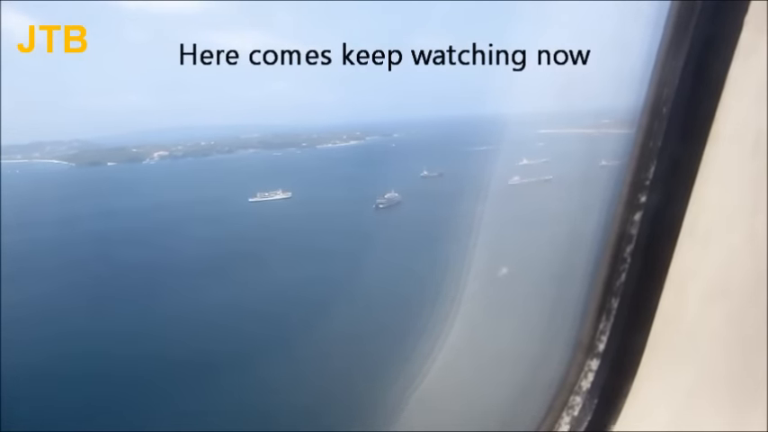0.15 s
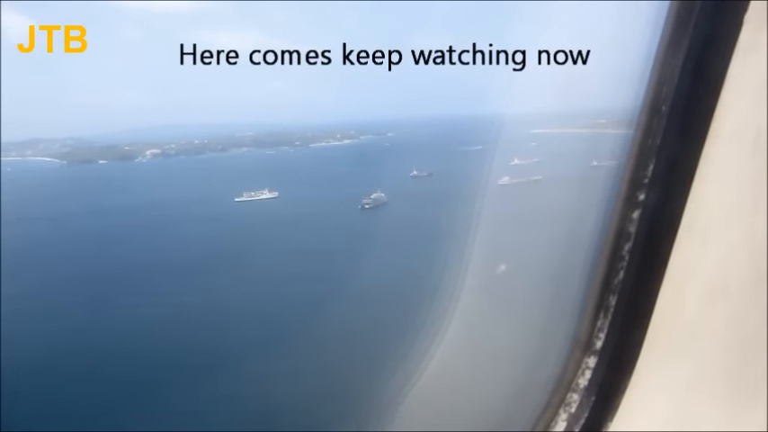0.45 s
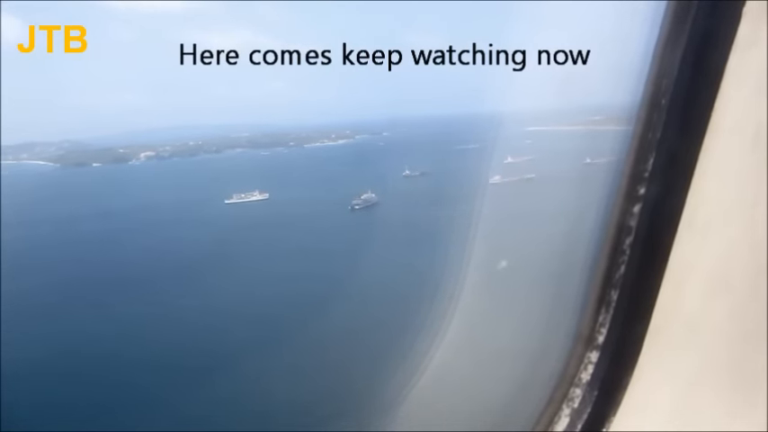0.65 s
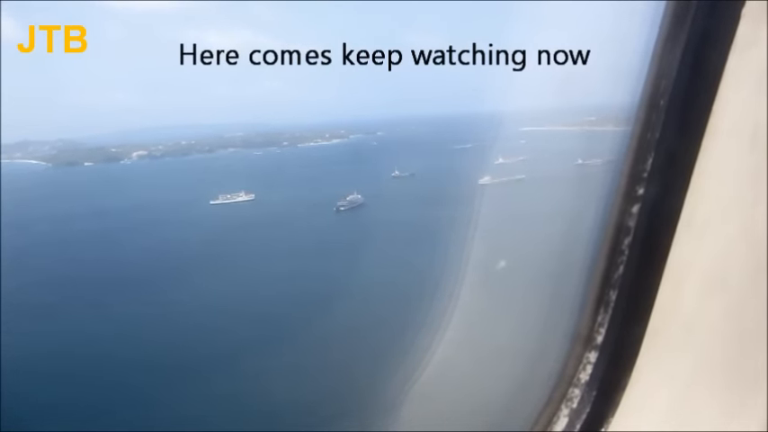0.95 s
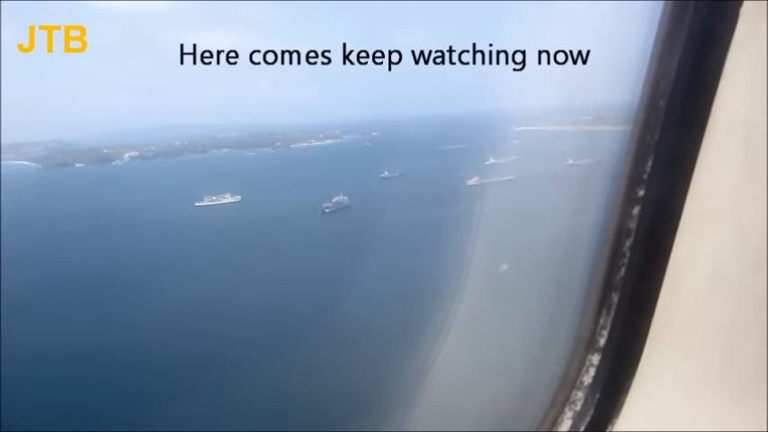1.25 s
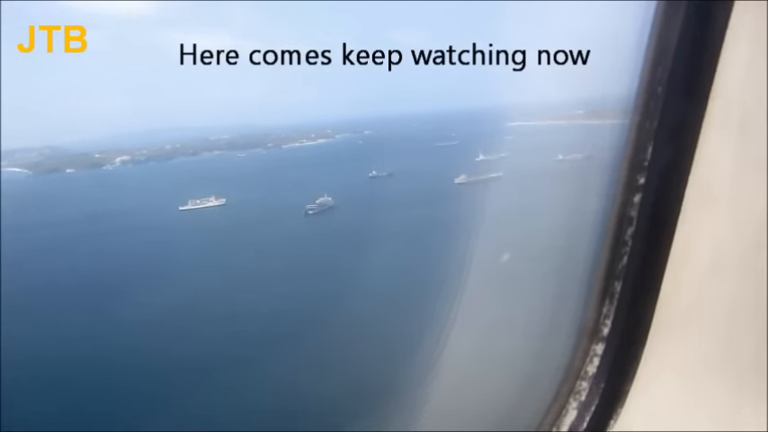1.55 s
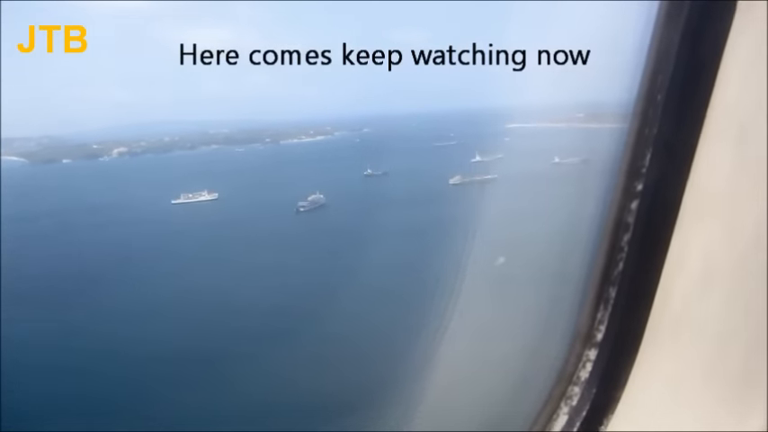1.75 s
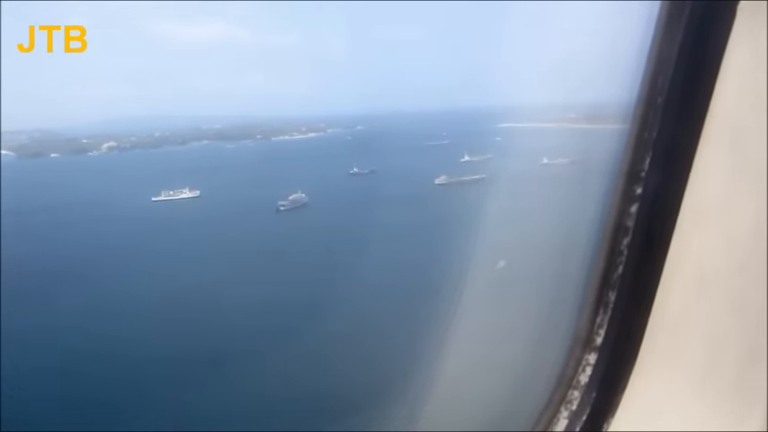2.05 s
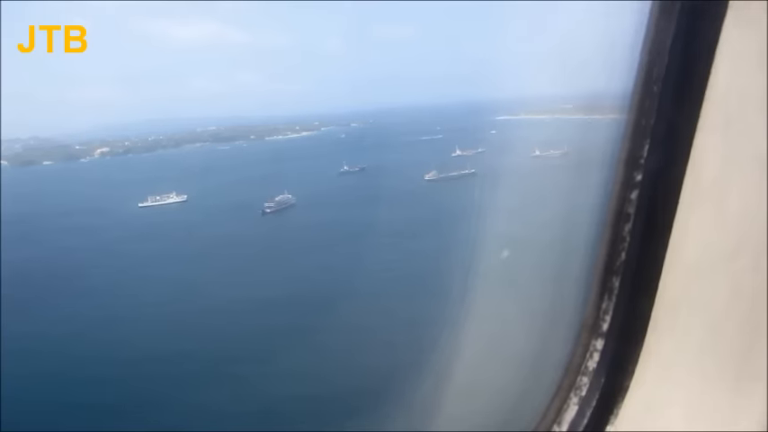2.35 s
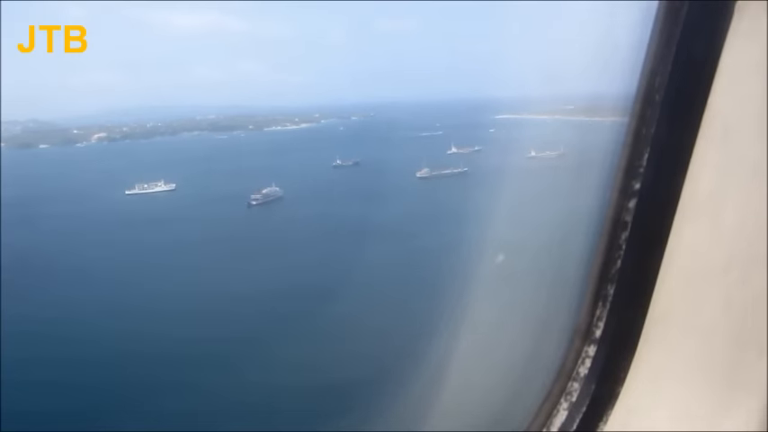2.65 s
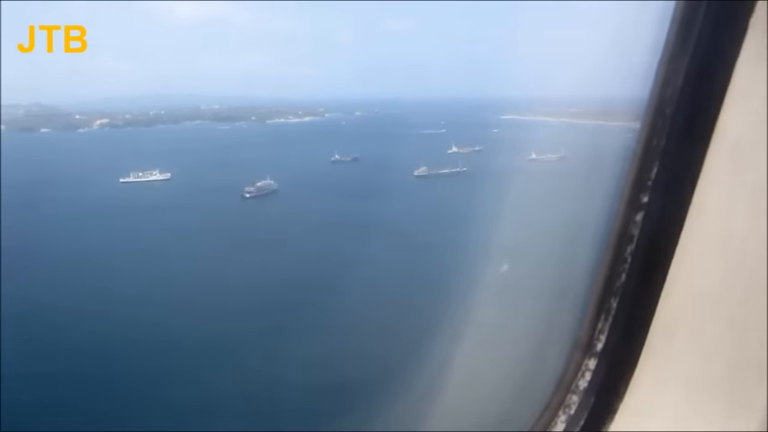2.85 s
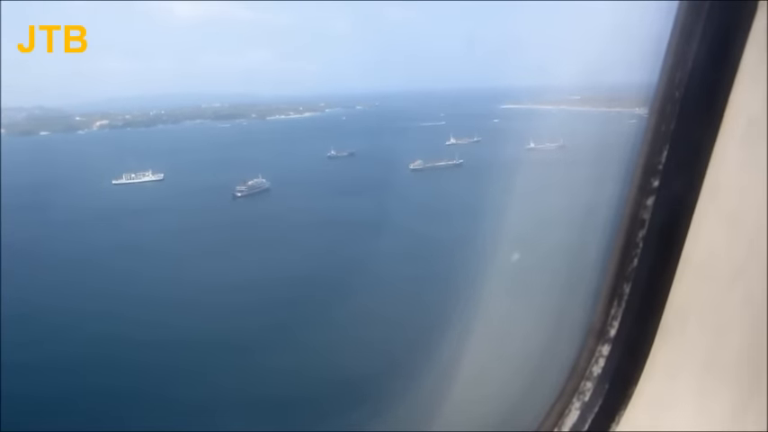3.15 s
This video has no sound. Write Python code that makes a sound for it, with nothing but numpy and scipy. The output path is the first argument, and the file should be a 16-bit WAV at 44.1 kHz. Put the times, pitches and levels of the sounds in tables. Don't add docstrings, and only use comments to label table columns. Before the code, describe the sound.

Steady low propeller drone heard inside an airliner cabin, with soft buffeting rumble, muffled air roar and a thin, wavering high whine; one small plastic tick near the end, close to the stereo camera microphone.

```python
import sys
import numpy as np
from scipy import signal
from scipy.fft import rfft, irfft, next_fast_len
from scipy.io import wavfile
from scipy.ndimage import uniform_filter1d, map_coordinates

SR = 44100
rng = np.random.default_rng(int(sys.argv[2]) if len(sys.argv) > 2 else 0)


def gain_from_db(level_db):
    decades = np.asarray(level_db, float) / 20
    return 10 ** decades


def wrap_up_sound(samples):
    columns = np.atleast_2d(samples).T
    tamed = np.clip(columns, -1, 1)
    steps = np.round(tamed * 32767).astype(np.int16)
    wavfile.write(sys.argv[1], SR, steps)


N = 145530

BLADE_HZ = 120.15

# time in seconds, blade tone in dB, its octave in dB.
BLADE_LEVELS = [(0, -20.5, -32.5), (.25, -19.5, -31.5), (.8, -20.5, -32), (1.4, -21.5, -31.5),
                (1.7, -21, -46.5), (2.05, -20, -33.5), (2.4, -20, -34), (2.6, -18, -33),
                (2.83, -19.5, -45.5), (3.1, -18.5, -35), (3.3, -21.5, -34.5)]
# time in seconds, tooth mesh rate in Hz.
NEAR_MESH = [(0, 5745), (.33, 5731), (.66, 5723), (1.0, 5718), (1.32, 5713), (1.65, 5711), (1.97, 5713),
             (2.3, 5718), (2.63, 5724), (2.96, 5729), (3.3, 5732)]
MESH_SIDES = [-87, -77, -82, -80, -76, -99, -74, -72.5, -76, -81, -80, -88]
OCTAVE_SIDES = [-84, -84, -78, -74, -79, -71, -69, -78, -76, -85, -84]
FAR_SIDES = [-8, 0, -15]
# time in seconds, near mesh tone in dB, far mesh tone in dB.
WHINE_LEVELS = [
    (0, -61, -84),
    (.6, -67, -84),
    (1.15, -72, -76),
    (1.45, -71, -63),
    (1.75, -64, -68),
    (2.1, -70, -71),
    (2.55, -67, -69),
    (2.9, -72, -79),
    (3.3, -70, -84),
]
# time in seconds, gear rasp in dB.
GEAR_EFFORT = [(0, -61.5), (.4, -63.5), (1.0, -62.5), (1.17, -59), (1.35, -61), (1.9, -62), (2.05, -56),
               (2.25, -64), (2.6, -59), (2.8, -66), (3.3, -61)]
# time in seconds, airflow in dB.
AIRFLOW = [
    (0, -36),
    (.85, -36),
    (1.3, -35.5),
    (1.6, -33.5),
    (2.2, -33.5),
    (2.7, -36.5),
    (2.95, -37.5),
    (3.3, -37.5),
]
# time in seconds, rumble in dB.
BUFFETS = [(0, -41), (.25, -30), (.42, -41), (.62, -29.5), (1.0, -39.5), (1.2, -35.5), (1.5, -36),
           (1.75, -34), (1.9, -37.5), (2.1, -29), (2.5, -39), (2.75, -34.5), (3.3, -41)]

# frequency in Hz, density in dB per Hz.
GEAR_RASP = [(4800, -25), (5300, -7), (5440, -14), (5680, -4), (5880, -6), (6000, 0), (6200, -8),
             (7000, -22)]
SKIN_ROAR = [(140, -7.5), (190, 0), (420, -3.5), (880, -15), (1150, -21), (1700, -24.5), (3050, -37),
             (3300, -54.5)]
SKIN_HISS = [(2800, 4.5), (3400, -3), (4800, -6.5), (7200, 0), (9300, -1.5), (12700, -1), (15000, -12),
             (15800, -21)]
CHOPPED_FIZZ = [(9300, -22), (10100, -6), (10900, -6), (11750, 1.5), (12500, -9.5), (13500, -31)]
HULL_RUMBLE = [(20, -15), (45, -3), (69, 11), (92, -2.5)]
HULL_BOOM = [(85, -26), (105, -3), (128, -3.5), (145, -3.5), (160, -15), (200, -13)]
PUMP_HUM = [(955, -33), (972, -4.5), (980, -0.5), (988, -5), (1005, -26.5)]

# frequency in Hz, correlation (0 to 1).
PORT_LIKENESS = [(60, .98), (350, .985), (700, .94), (1400, .86), (3100, .58), (6000, .72), (8000, .35),
                 (13000, .3)]
# frequency in Hz, difference in dB.
PORT_LEAN = [(30, -6.5), (120, -3), (240, -2), (500, 0), (1200, -.5), (2400, .5), (5700, -.8), (9000, -2.8)]
# frequency in Hz, lead in radians.
PORT_LEAD = [(30, 1.5), (120, .72), (240, .52), (400, .42), (980, -.15), (3100, -.5), (8500, -1.6),
             (12000, .9)]

# time in seconds, level in dB.
TICK_BLOWS = [
    (2.9697, -28.5),
]
# frequency in Hz, bandwidth in Hz, level in dB.
TICK_BODY = [
    (1500, 400, 6),
    (2200, 900, -6),
    (4400, 1200, -21),
]


def unit(x):
    return x / np.sqrt(np.mean(x ** 2) + 1e-20)


def along(points, hz):
    f, values = np.transpose(points)
    return np.interp(np.log(hz + 1), np.log(f + 1), values)


def curves(rows):
    seconds, *columns = np.transpose(rows)
    return [np.interp(np.arange(N) / SR, seconds, column) for column in columns]


def wobble(rate):
    return map_coordinates(rng.standard_normal(400), [np.arange(N) * rate / SR])


def filtered(x, response):
    size = next_fast_len(N + SR // 2)
    return irfft(rfft(x, size) * response(np.fft.rfftfreq(size, 1 / SR)), size)[..., :N]


def ports(hz):
    half = np.log(gain_from_db(along(PORT_LEAN, hz))) / 2 + .5j * along(PORT_LEAD, hz)
    return np.exp(np.array([half, -half]))


def tone(phase, hz):
    return np.sqrt(2) * np.real(ports(hz)[:, None] * np.exp(1j * phase))


def rush(spectrum, patchy_db):
    grains = signal.stft(rng.standard_normal((2, N)), nperseg=512)[2]
    patches = uniform_filter1d(rng.standard_normal(grains.shape[1:]), size=6, axis=0)
    patches = uniform_filter1d(patches, size=14, axis=1)
    pair = signal.istft(grains * gain_from_db(patchy_db * unit(patches)), nperseg=512)[1][:, :N]

    def turn(hz):
        return np.arccos(np.clip(along(PORT_LIKENESS, hz), -1, 1)) / 2

    def colour(hz):
        inside = (hz > spectrum[0][0]) & (hz < spectrum[-1][0])
        return inside * gain_from_db(along(spectrum, hz)) * ports(hz)

    shared = filtered(pair[0], lambda hz: colour(hz) * np.cos(turn(hz)))
    apart = filtered(pair[1], lambda hz: colour(hz) * np.sin(turn(hz)) * [[1], [-1]])
    return (shared + apart) / np.std(shared.mean(axis=0))


def blade_angle():
    return 2 * np.pi * BLADE_HZ * np.arange(N) / SR - 1.68 + .07 * wobble(1.8)


def propellers(angle):
    tone_db, octave_db = curves(BLADE_LEVELS)
    first = gain_from_db(tone_db) * tone(angle, BLADE_HZ)
    octave = gain_from_db(octave_db) * tone(2 * angle + 2.2 + .3 * wobble(1.2), 2 * BLADE_HZ)
    third = gain_from_db(-53 + 4 * wobble(4.5)) * tone(3 * angle, 3 * BLADE_HZ)
    return first + octave + third


def comb(carrier_hz, angle, levels_db, order, fade_db):
    carrier = 2 * np.pi * np.cumsum(carrier_hz) / SR
    total = 0
    for k, db in enumerate(levels_db):
        port_fade_db = 1.5 * np.array([wobble(2.2), wobble(2.2)])
        level = gain_from_db(db + fade_db * wobble(3.2) + port_fade_db)
        blur = .55 * wobble(9) + .8 * rng.normal()
        total = total + level * tone(carrier + (order + k) * angle + blur, carrier_hz[0])
    return total


def gearboxes(angle):
    mesh_hz, = curves(NEAR_MESH)
    mesh_hz = uniform_filter1d(mesh_hz, size=SR // 3, mode="nearest")
    effort_db, = curves(GEAR_EFFORT)
    near_db, far_db = curves(WHINE_LEVELS)
    sides = comb(mesh_hz, angle, MESH_SIDES, order=-5, fade_db=2.5)
    sides += comb(2 * mesh_hz, angle, OCTAVE_SIDES, order=-3, fade_db=2.5)
    sides += comb(2 * mesh_hz + 290, angle, [-77], order=0, fade_db=2.5)
    near = gain_from_db(near_db) * comb(mesh_hz, angle, [0], order=0, fade_db=1)
    far = gain_from_db(far_db) * comb(mesh_hz + 210, angle, FAR_SIDES, order=-1, fade_db=1)
    rasp = gain_from_db(effort_db - 3 + .7 * np.cos(angle + 1.3)) * rush(GEAR_RASP, patchy_db=-0.8)
    return gain_from_db(0.62 * (effort_db - effort_db.mean())) * sides + near + far + rasp


def airflow(angle):
    flow_db, = curves(AIRFLOW)
    roar_db = 2 + 0.15 * wobble(6.58) + 0.82 * np.cos(angle + 0.73)
    hiss_db = -24.5 + 0.47 * wobble(9.2)
    fizz_db = -26.5 + 0.32 * (flow_db - flow_db.mean()) + 0.73 * wobble(6.5) + 1.2 * np.cos(angle - .7)
    roar = gain_from_db(roar_db) * rush(SKIN_ROAR, patchy_db=0.14)
    hiss = gain_from_db(hiss_db) * rush(SKIN_HISS, patchy_db=0.85)
    fizz = gain_from_db(fizz_db) * rush(CHOPPED_FIZZ, patchy_db=2.8)
    return gain_from_db(flow_db) * (roar + hiss + fizz)


def hull():
    buffet_db, = curves(BUFFETS)
    rumble = gain_from_db(buffet_db) * rush(HULL_RUMBLE, patchy_db=-0.6)
    boom = gain_from_db(-34) * rush(HULL_BOOM, patchy_db=2.5)
    return rumble + boom


def pump():
    return gain_from_db(-55) * rush(PUMP_HUM, patchy_db=3.2)


def ticks():
    blows = np.zeros(N)
    for s, db in TICK_BLOWS:
        blows[round(s * SR)] = gain_from_db(db)

    def body(f):
        return sum(gain_from_db(db) * 1j * f * width / (centre * centre - f * f + 1j * f * width)
                   for centre, width, db in TICK_BODY)

    return 6 * filtered(blows, lambda f: body(f) / (1 + 1j * f / 4500) ** 3)


def scene():
    angle = blade_angle()
    return propellers(angle) + gearboxes(angle) + airflow(angle) + hull() + pump() + ticks()


def band_limit(x):
    return signal.sosfilt(signal.butter(12, 15745, fs=SR, output="sos"), x)


def record(dry):
    return band_limit(dry)


dry = scene()
out = record(dry)
wrap_up_sound(out)
```